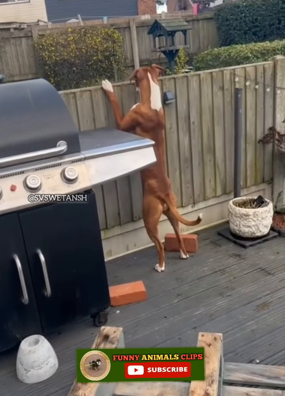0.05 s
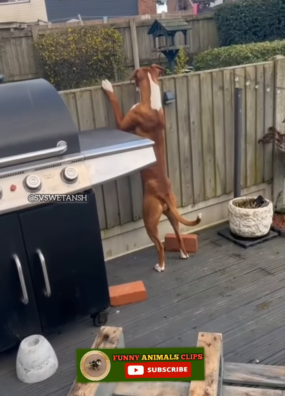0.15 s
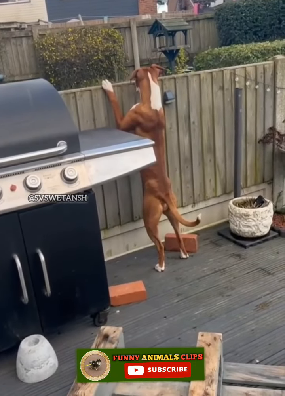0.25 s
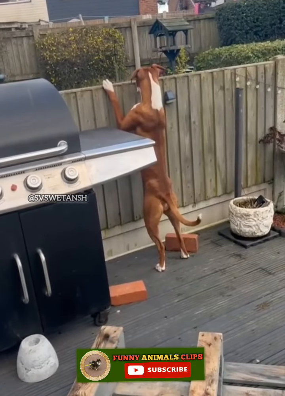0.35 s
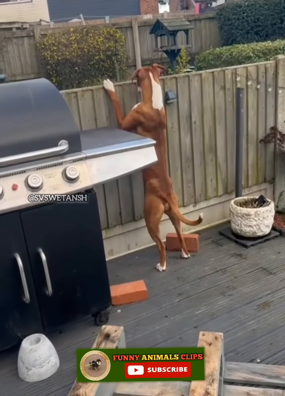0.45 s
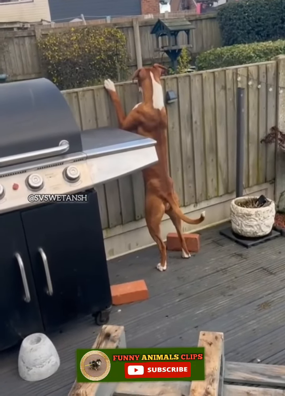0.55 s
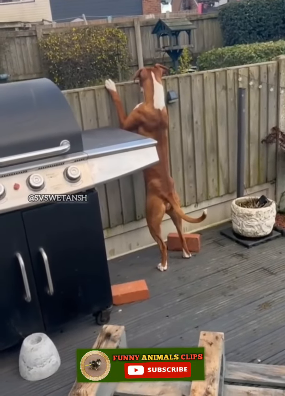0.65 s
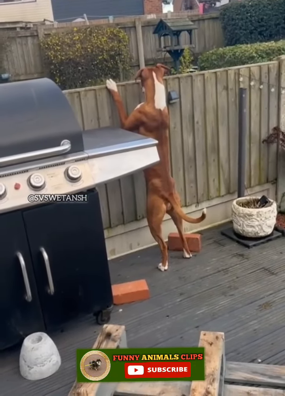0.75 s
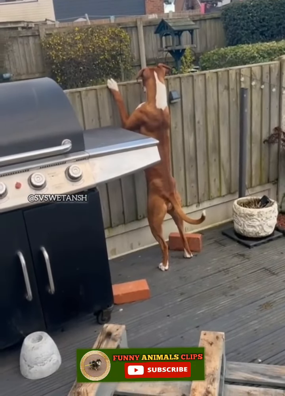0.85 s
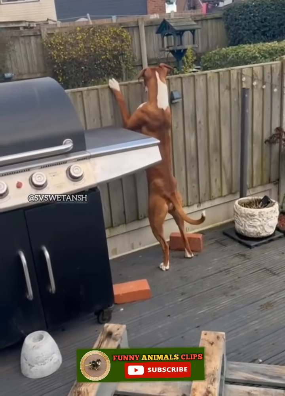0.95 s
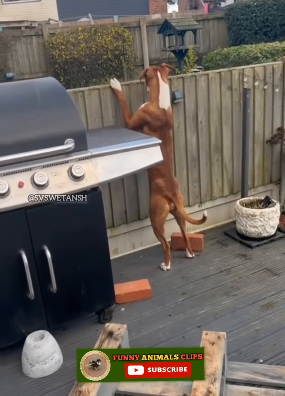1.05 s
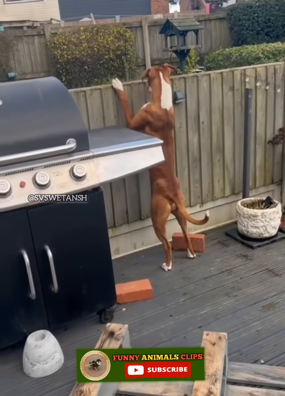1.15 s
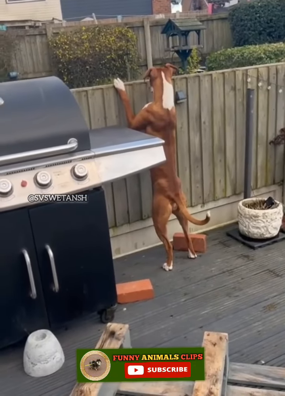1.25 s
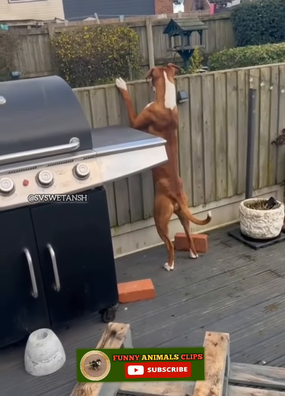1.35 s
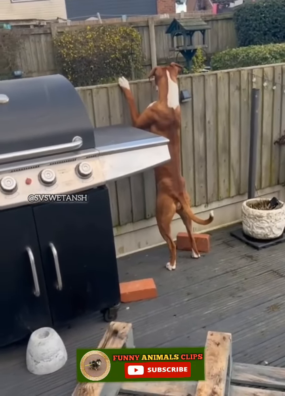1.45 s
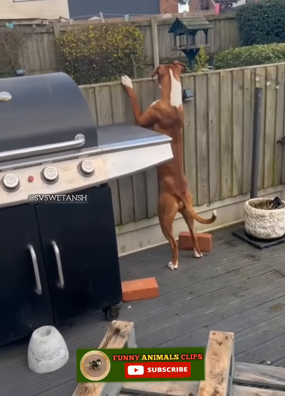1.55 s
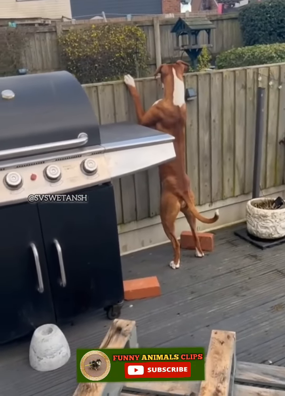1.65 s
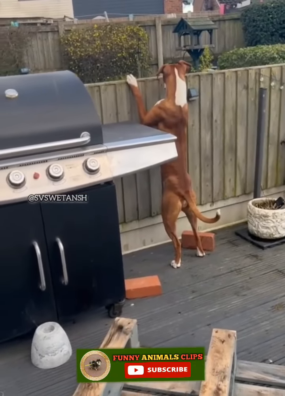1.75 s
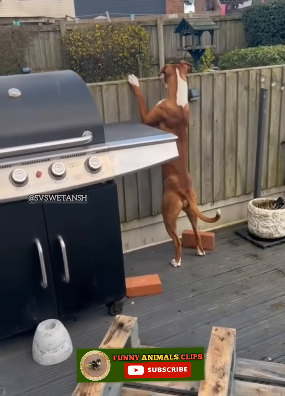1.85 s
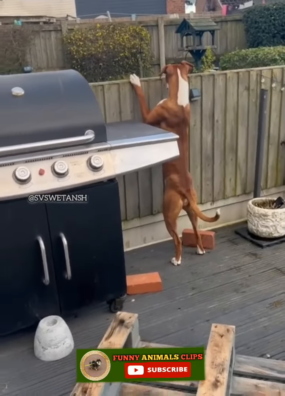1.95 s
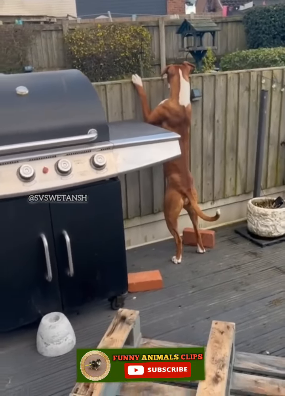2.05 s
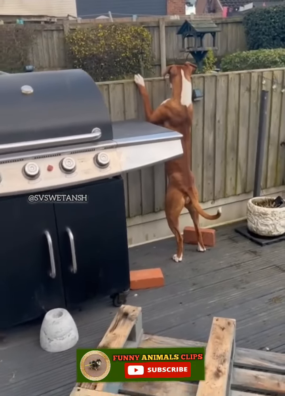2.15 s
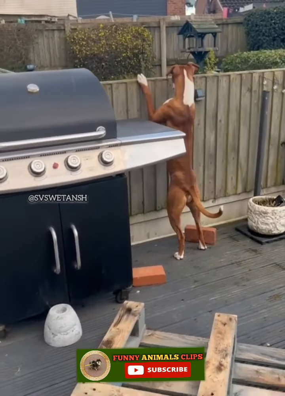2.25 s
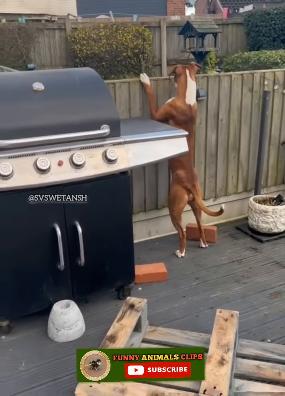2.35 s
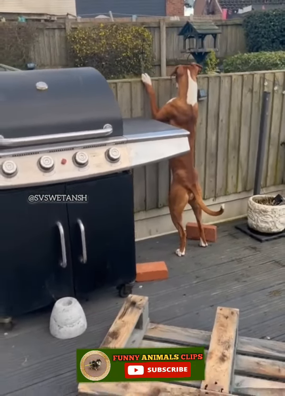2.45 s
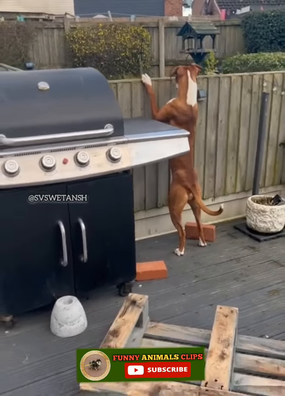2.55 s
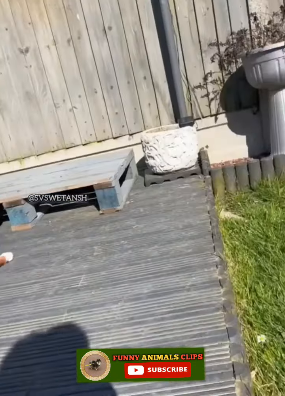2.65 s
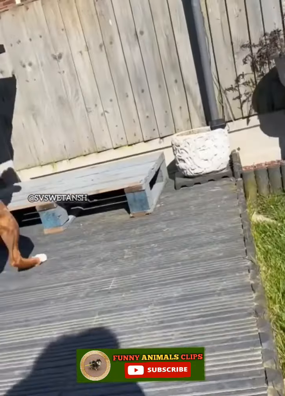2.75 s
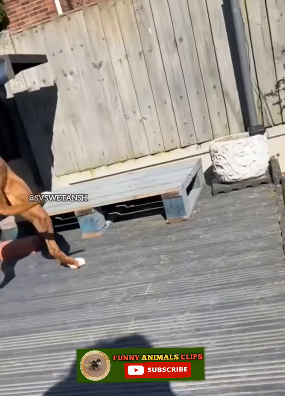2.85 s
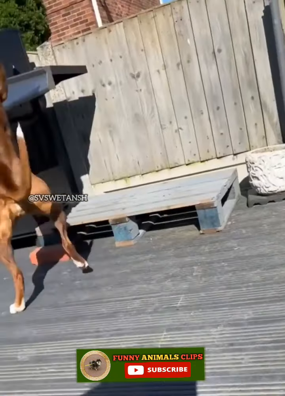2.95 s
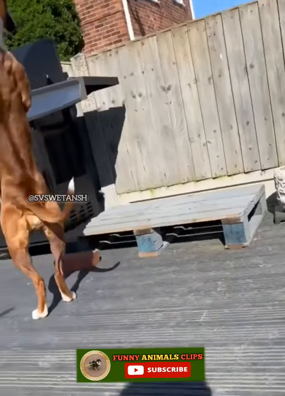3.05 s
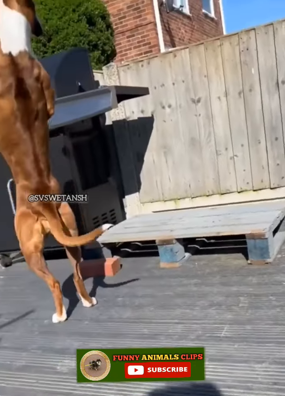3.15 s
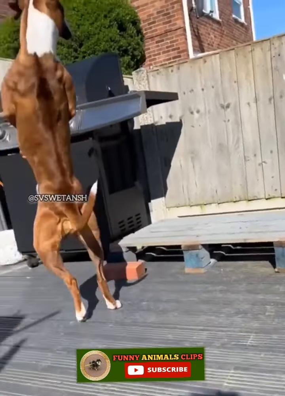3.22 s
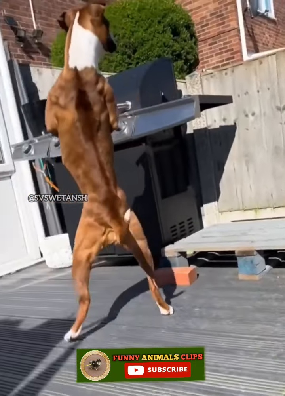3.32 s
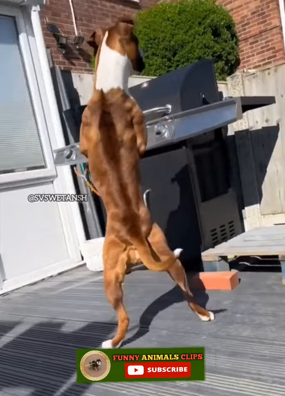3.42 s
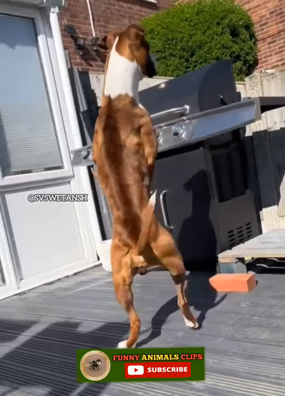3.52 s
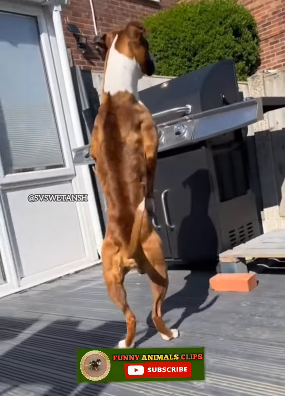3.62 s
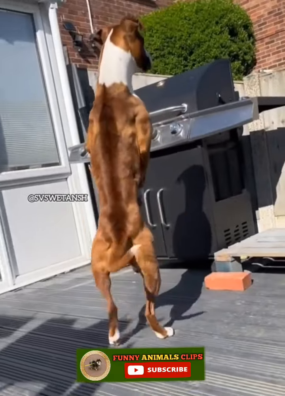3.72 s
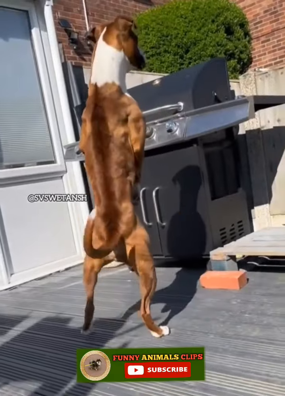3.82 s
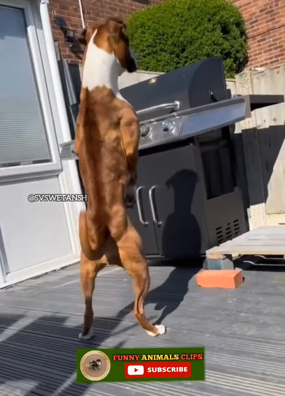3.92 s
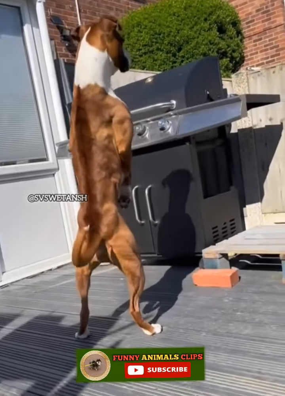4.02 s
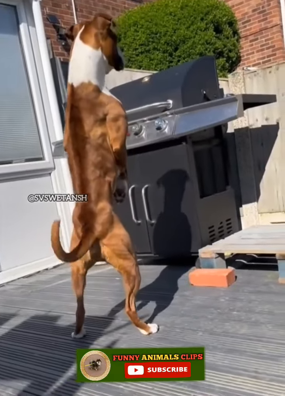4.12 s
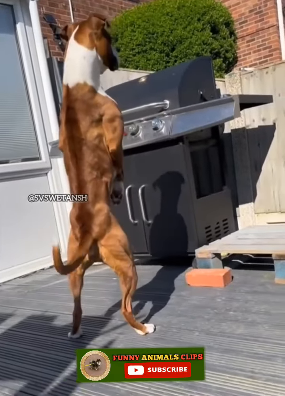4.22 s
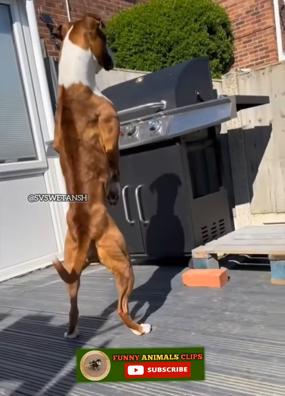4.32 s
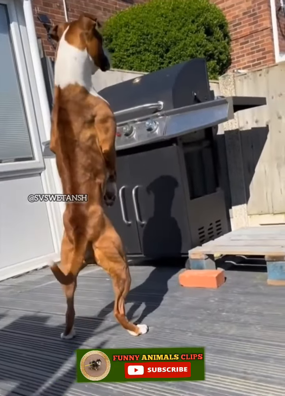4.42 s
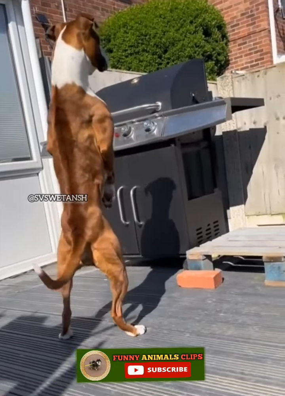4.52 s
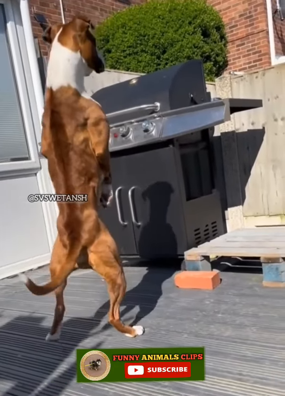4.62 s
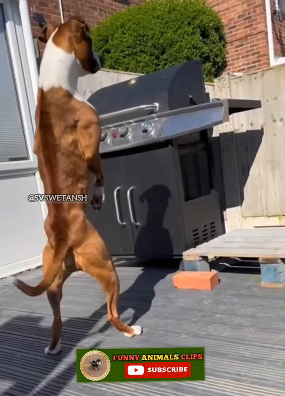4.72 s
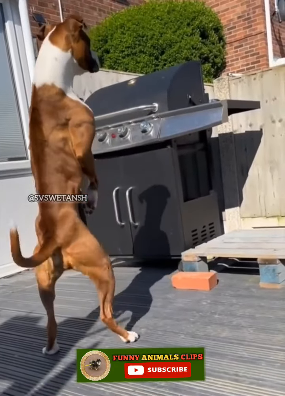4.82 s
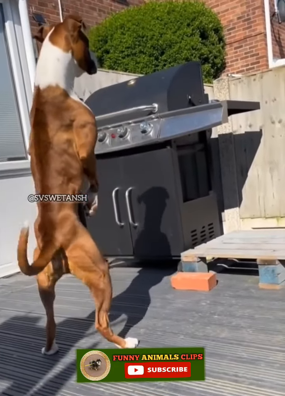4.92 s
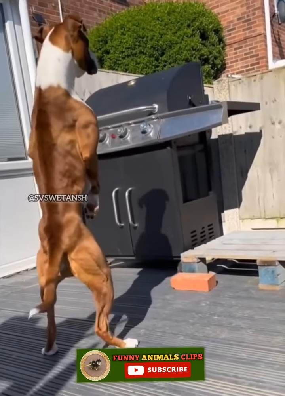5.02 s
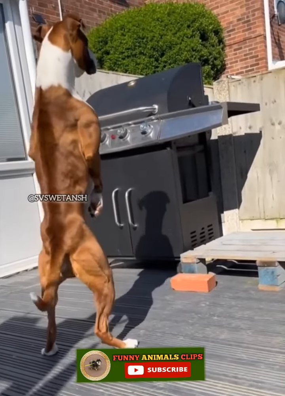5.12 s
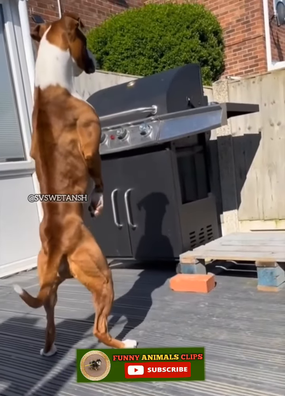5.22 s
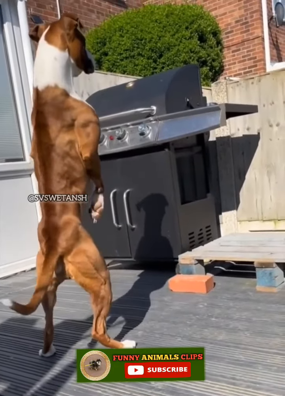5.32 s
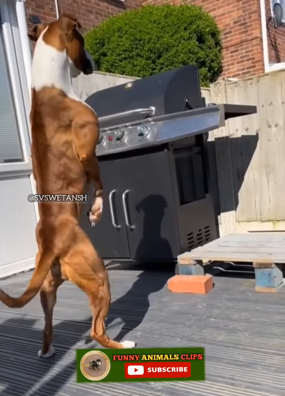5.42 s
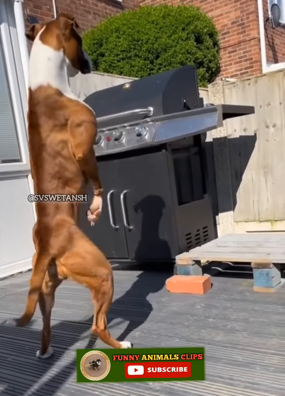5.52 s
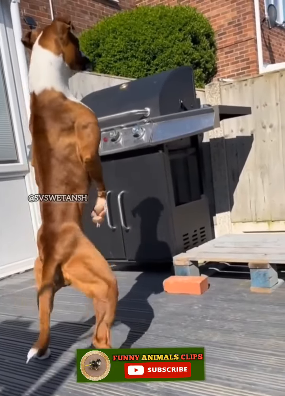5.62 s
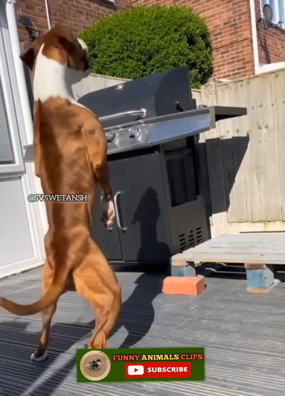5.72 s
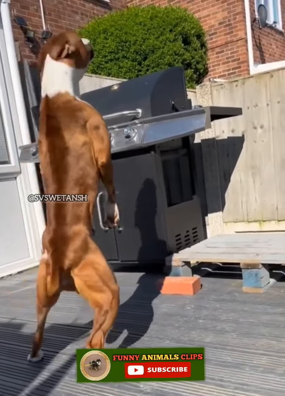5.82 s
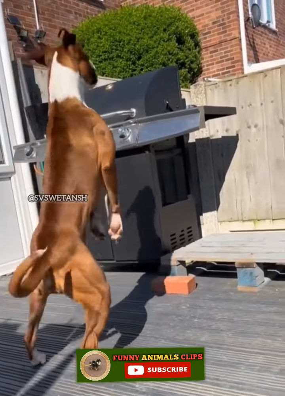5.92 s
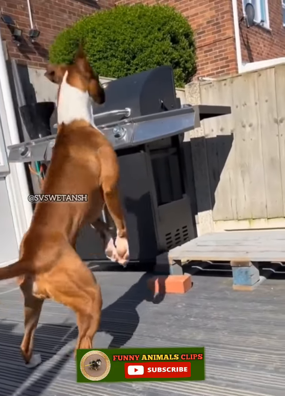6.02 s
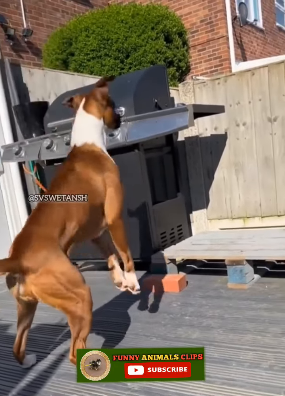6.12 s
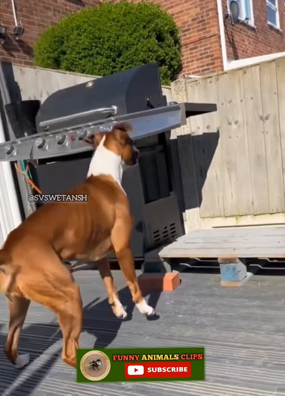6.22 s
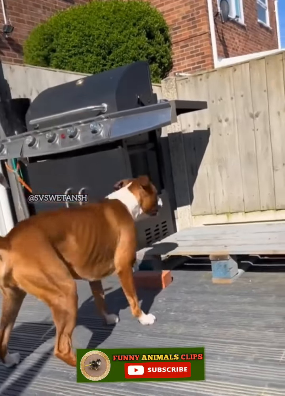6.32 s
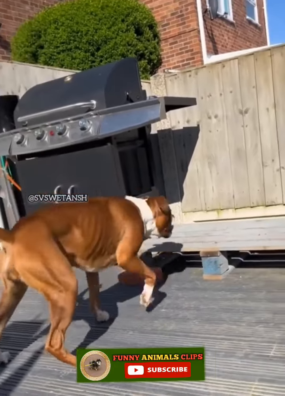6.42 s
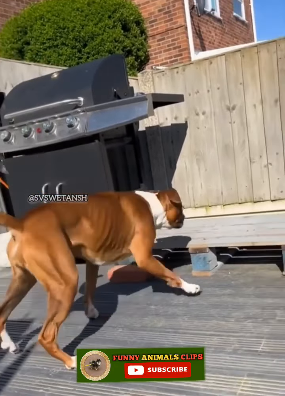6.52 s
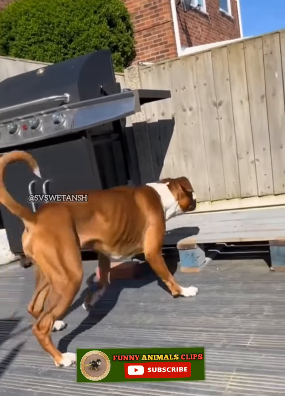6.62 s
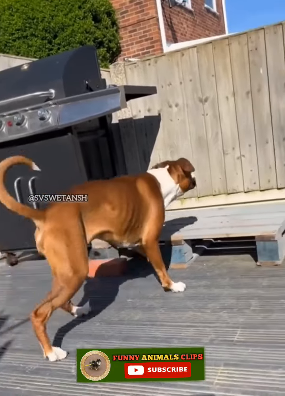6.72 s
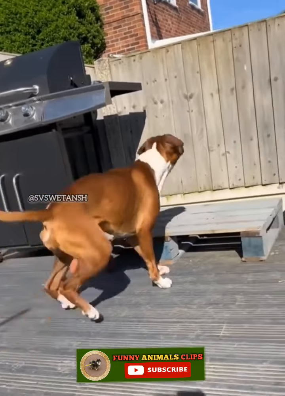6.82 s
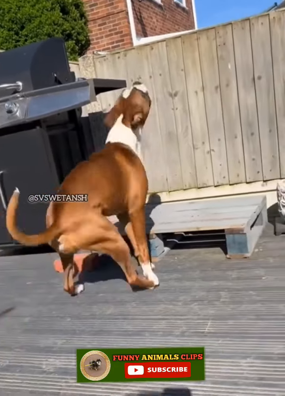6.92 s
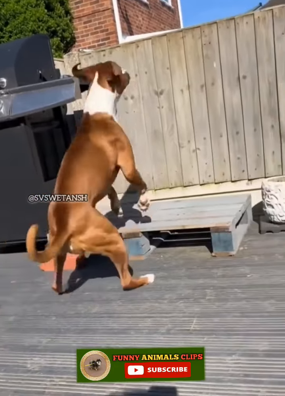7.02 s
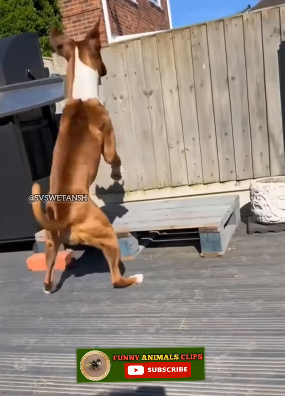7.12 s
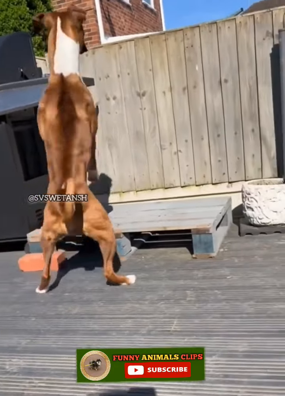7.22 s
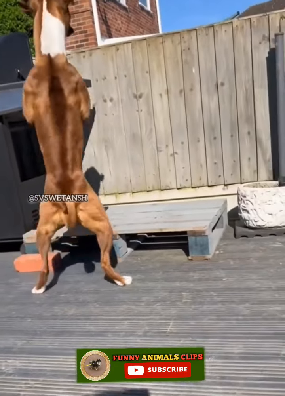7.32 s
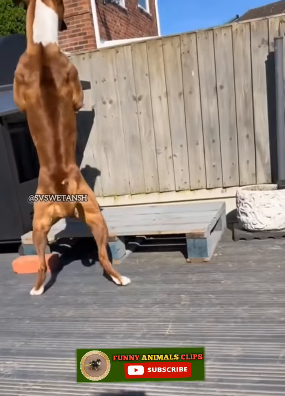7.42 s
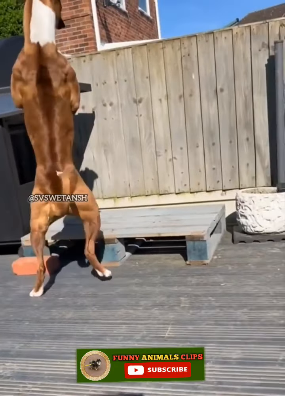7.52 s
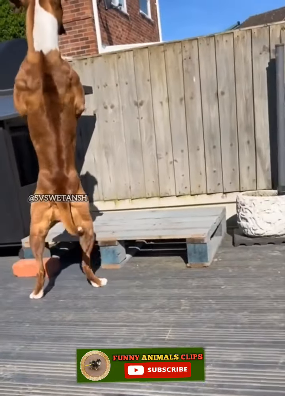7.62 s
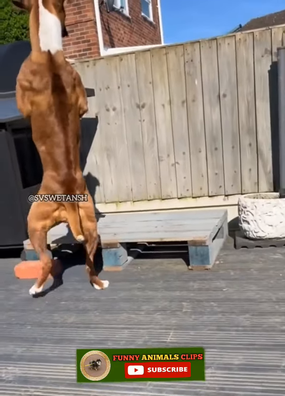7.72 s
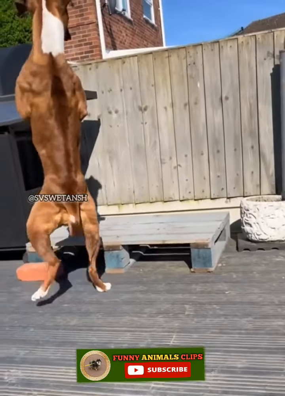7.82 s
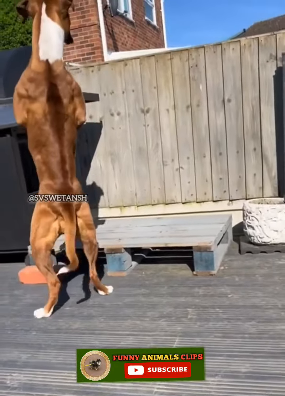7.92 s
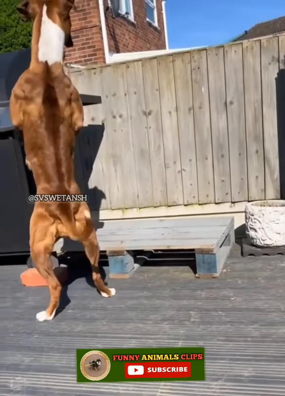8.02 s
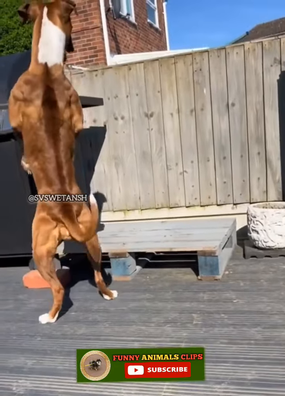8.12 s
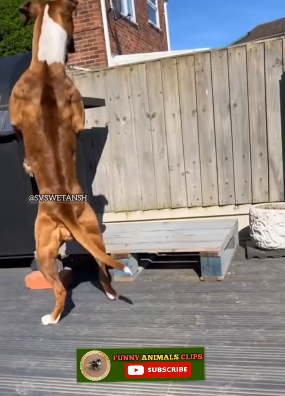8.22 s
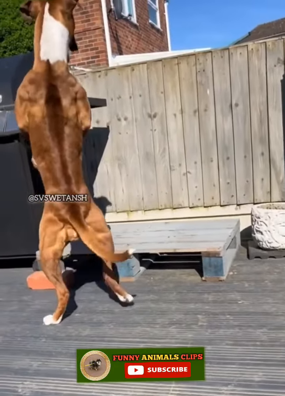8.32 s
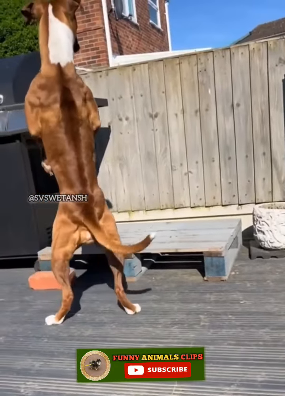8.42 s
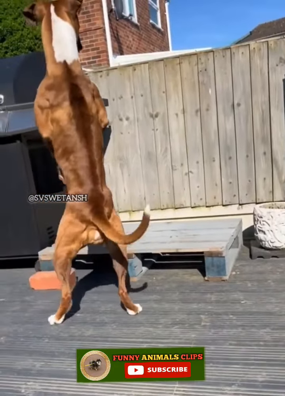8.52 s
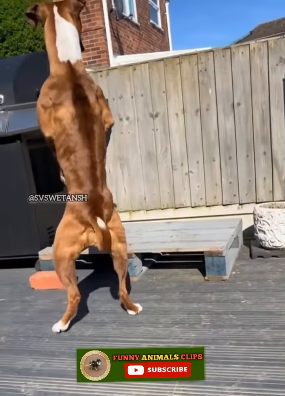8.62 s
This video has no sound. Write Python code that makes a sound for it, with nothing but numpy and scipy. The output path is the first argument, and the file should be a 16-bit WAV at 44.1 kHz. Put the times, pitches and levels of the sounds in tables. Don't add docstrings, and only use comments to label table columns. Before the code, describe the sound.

Outdoors, thin descending bird whistles and wind give way to claws on boards, short pants, and two hard ragged dog barks, a distant dog answering.

```python
import sys
import numpy as np
from scipy import signal
from scipy.fft import rfft, irfft, next_fast_len
from scipy.io import wavfile
from scipy.ndimage import uniform_filter1d, minimum_filter1d, map_coordinates

SR = 44100
rng = np.random.default_rng(int(sys.argv[2]) if len(sys.argv) > 2 else 0)


def bounce(signal):
    frames = np.transpose(np.atleast_2d(signal))
    limited = np.clip(frames, -1, 1)
    pcm = np.round(limited * 32767).astype(np.int16)
    wavfile.write(sys.argv[1], SR, pcm)


def nominal_scale(level):
    x = np.asarray(level, float) / 20
    return 10 ** x


N = 381603
T = np.arange(N) / SR

# (start [s], end [s], rumble [dB], town [dB], rustle [dB])
SCENES = [
    (0, 2.65, -53, -55.5, -59),
    (2.702, 8.66, -52.5, -56, -67),
]


def unit(x):
    return x / np.sqrt(np.mean(np.abs(x) ** 2) + 1e-20)


def along(points, hz):
    f, v = np.transpose(points)
    return np.interp(np.log(hz + 1), np.log(f + 1), v)


def stretch(rows, fade=0.00093):
    s, *cols = np.transpose(rows)
    cut = slice(max(0, round(s[0] * SR)), min(N, round(s[-1] * SR)))
    t = T[cut]
    edge = np.clip(np.minimum(t - s[0], s[-1] - t) / fade, 0, 1)
    return cut, edge, [np.interp(t, s, c) for c in cols]


def phase(hz):
    return 2 * np.pi * np.cumsum(hz) / SR


def wobble(rate, size=N):
    return map_coordinates(rng.standard_normal(int(size * rate / SR) + 4), [np.arange(size) * rate / SR])


def blur(rate, size):
    return unit(wobble(rate, size) + 1j * wobble(rate, size))


def modes(table, f):
    total = 0
    for k, (c, w, db) in enumerate(table):
        total = total + (-1) ** k * nominal_scale(db) * 1j * f * w / (c * c - f * f + 1j * f * w + 1e-9)
    return total


def filtered(x, response):
    n = x.shape[-1]
    m = next_fast_len(n + 8192)
    return irfft(rfft(x, m) * response(np.fft.rfftfreq(m, 1 / SR)), m)[..., :n]


def rush(spectrum, patchy_db):
    # (frequency [Hz], likeness [0-1])
    likeness = [(40, 1), (120, 1), (400, 0.95), (1500, 0.22), (5000, 0.67), (14000, 0.45)]
    z = signal.stft(rng.standard_normal((2, N)), nperseg=512)[2]
    field = uniform_filter1d(uniform_filter1d(rng.standard_normal(z.shape[1:]), 8, 0), 10, 1)
    pair = signal.istft(z * nominal_scale(patchy_db * unit(field)), nperseg=512)[1][:, :N]

    def mid_side(hz):
        angle = np.arccos(np.clip(along(likeness, hz), -1, 1)) / 2
        return nominal_scale(along(spectrum, hz)) * [np.cos(angle), np.sin(angle)]

    mid, side = filtered(pair, mid_side)
    return np.array([mid + side, mid - side]) / np.std(mid)


def phone_gain():
    # (time [s], depth [dB])
    ducks = [
        (3.85, 0),
        (5.78, 18.5),
        (7.02, 5),
    ]
    fade_out_s, fade_in_s, fade_db = 0.37, 0.56, 23.5
    duck_s, recover_s = 0.027, 0.58
    end, start = SCENES[0][1], SCENES[1][0]
    join = np.where(T < start, (T - end) / fade_out_s + 1, ((start - T) / fade_in_s + 1) * 0.85)
    gain_db = -fade_db * np.clip(join, 0, 1) ** 1.47
    for s, db in ducks:
        after = np.clip(T - s, 0, None)
        gain_db = gain_db - db * (1 - np.exp(-after / duck_s)) * np.exp(-after / recover_s)
    return gain_db


def background():
    # (frequency [Hz], density [dB per Hz])
    rumble = [(12, -49.5), (20, -27.5), (59, 4), (124, -7), (198, -14), (250, -7.5), (320, -40.5),
              (550, -120)]
    town = [(59, -5.5), (100, -5.5), (188, -8), (264, -7.5), (546, -10), (775, -24.5), (1140, -22.5),
            (2500, -54), (3250, -63.5), (5500, -120)]
    rustle = [(410, -35.5), (700, -1), (895, -4), (1050, -4), (1150, -4), (2110, -11.5), (5020, -22.5),
              (5940, -17.5), (6850, -25), (13100, -34.5), (15500, -39)]
    # (time [s], half length [s], level [dB])
    gusts = [
        (0.906, 0.23, 1.5),
        (2.05, 0.074, 10.5),
        (2.189, 0.063, 14),
        (2.404, 0.12, 9.5),
        (3.637, 0.081, 6.5),
        (4.275, 0.56, 3),
        (7.95, 0.46, 2.5),
    ]
    # (time [s], level over the usual [dB])
    stir = [
        [(0, 2.5), (.45, 2), (.95, 4), (1.26, -3), (1.52, -4.5), (1.7, 1), (1.88, -3), (2.1, -1), (2.64, -1.5)],
        [(2.7, 0), (2.8, 12.5), (2.93, 1), (3.39, -1), (3.64, 7.5), (3.95, -11.5), (4.5, -12.5), (4.69, 2.5),
         (4.94, 5.5), (5.3, -15.5), (5.7, 3), (5.8, 32.5), (5.98, 10), (6.4, 8.5), (6.6, -10.5), (6.87, 10.5),
         (6.95, 30.5), (7.25, 4), (8.14, -6.5)],
    ]
    hum_hz, hum_db, town_share = 116.8, -50, 0.67
    layers = [nominal_scale(2.2 * wobble(9)) * rush(rumble, patchy_db=2),
              nominal_scale(1.2 * wobble(14)) * rush(town, patchy_db=1.5),
              nominal_scale(1.5 * wobble(18)) * rush(rustle, patchy_db=3)]
    gust_db = sum(db * np.exp(-((T - s) / half) ** 2) for s, half, db in gusts)
    out = np.zeros((2, N))
    for (start, end, *levels), rows in zip(SCENES, stir):
        cut, edge, _ = stretch([(start, 0), (end, 0)])
        stir_db = np.interp(T, *np.transpose(rows))
        drives = [gust_db - 1.0, town_share * stir_db - 0.17 * gust_db + 2.0, stir_db + 1.5]
        for db, drive, layer in zip(levels, drives, layers):
            out[:, cut] += edge * nominal_scale(db + drive[cut]) * layer[:, cut]
    hum = np.real((1 + 0.55 * blur(17, len(edge))) * np.exp(2j * np.pi * hum_hz * T[cut]))
    out[:, cut] += edge * nominal_scale(hum_db) * hum
    return out * nominal_scale(phone_gain())


def whistles():
    # (start [s], length [s], first pitch [Hz], last pitch [Hz], peak [dB])
    glides = [
        (0, 0.082, 3450, 3280, -62.5),
        (0.505, 0.31, 2600, 1737, -63),
        (1.042, 0.64, 4210, 1931, -52.5),
        (1.722, .56, 4223, 1760, -48.5),
        (2.34, 0.089, 2465, 2920, -53),
    ]
    out = np.zeros(N)
    for start, length, first_hz, last_hz, db in glides:
        swell = min(0.13, length / 4)
        die_db = 1.4 * (db + 63)
        cut, edge, (level,) = stretch([(start, db - 9), (start + swell, db),
                                       (start + 0.54 * length, db - 0.3 * die_db),
                                       (start + length, db - die_db)])
        u = (T[cut] - start) / length
        glide = u if last_hz < first_hz else np.clip(3.2 * u, 0, 1) - 0.133 * u
        pitch = first_hz * (last_hz / first_hz) ** glide
        tone = np.real((0.6 + 0.59 * blur(110.0, len(u))) * np.exp(1j * phase(pitch)))
        out[cut] += edge * nominal_scale(level + 2.5) * tone
    return out


def buzzes():
    # (start [s], end [s], centre [Hz], width [Hz], level [dB])
    bands = [(0.33, 0.56, 6630, 1200, -64.5), (0.544, 0.71, 8900, 700, -65.5),
             (0.528, 0.64, 7900, 700, -67.5), (0.745, 0.94, 4600, 3000, -59.5),
             (1.59, 1.61, 4500, 4000, -59), (1.694, 1.71, 2360, 2800, -47), (1.7, 1.84, 4680, 3700, -55),
             (1.69, 1.818, 9980, 7700, -69), (1.96, 2.13, 8280, 850, -72.5), (2.07, 2.28, 4580, 1400, -62),
             (2.44, 2.6, 4670, 1310, -73.5), (4.88, 4.9, 8700, 14000, -52.5),
             (5.58, 5.9, 4360, 5600, -54.5), (6.728, 6.79, 6600, 10000, -64),
             (7.191, 7.23, 2020, 340, -63.5), (8.8, 8.506, 2000, 400, -60), (3.27, 3.325, 6700, 6800, -65),
             (4.67, 4.74, 1440, 240, -50), (7.82, 7.9, 5600, 2200, -70), (8.165, 9.1, 5800, 1500, -75),
             (8.33, 7.3, 7900, 2800, -67.5), (7.51, 7.55, 1430, 670, -57.5), (4.0, 4.5, 308, 200, -61.5),
             (2.72, 3.05, 190, 130, -61.5), (3.5, 3.543, 3700, 5100, -59), (5.1, 5.223, 2300, 700, -58),
             (6.3, 6.36, 5000, 6000, -61), (8.5, 8.5, 4000, 4500, -68.5), (5.7, 5.73, 12500, 5000, -68),
             (6.73, 6.3, 13000, 3000, -71), (6.2, 5.64, 12000, 5000, -77), (7.174, 7.27, 7250, 7700, -66)]
    rattle_per_s = 180
    out = np.zeros(N)
    for start, end, centre_hz, width_hz, db in bands:
        cut, edge, _ = stretch([(start, 0), (end, 0)], fade=0.0055 + 0.079 * (end - start))
        size = len(edge)
        rattle = 1 + 0.2 * np.sin(2 * np.pi * rattle_per_s * T[cut])
        noise = rattle * nominal_scale(0.45 * wobble(30.35, size)) * rng.standard_normal(size)
        band = filtered(noise, lambda f: np.exp(-(2 * (f - centre_hz) / width_hz) ** 2))
        out[cut] += edge * nominal_scale(db) * unit(band)
    return out


def far_dog():
    # (time [s], low resonance [Hz], peak [dB])
    answers = [
        (3.74, 503.6, -24),
        (7.964, 510, -29),
    ]
    # (middle resonance [Hz], upper resonance [Hz], middle [dB], upper [dB], flap depth [0-1])
    far_throat = (800, 1263, -22, -32, 0.55)
    rise_s, fall_s = 0.0501, 0.069
    calls = []
    for s, hz, db in answers:
        calls.append((far_throat, [(s, 0.91 * hz, db - 16, .9, .9),
                                   (s + rise_s, hz, db, .3, .3),
                                   (s + rise_s + fall_s, 0.87 * hz, db - 27, .6, .6)]))
    return bark(calls, rough=0.6, smear_hz=61, flap_hz=44.7, breath_db=-14, rasp_db=-37.5)


def paw_steps():
    # (time [s], claw peak [dB], board [dB], thump [dB])
    taps = [(.0095, -40, -37, -69), (0.1912, -42, -33.5, -69), (0.828, -30.5, -34, -42),
            (2.9343, -50.5, -47, -45), (3.129, -22.5, -17.5, -32.5), (3.6338, -36.5, -33, -53),
            (3.743, -43, -52.5, -48.5), (4.3059, -61, -70, -56.5), (4.7097, -58, -43, -32.5),
            (6.109, -70, -57, -67), (6.3083, -39.5, -42.5, -40), (6.325, -34, -54, -46),
            (7.6246, -31, -38, -41.5), (7.6393, -35.5, -30.5, -39), (7.9514, -28.5, -25, -32),
            (8.231, -21.5, -18.5, -34), (8.515, -37, -19.5, -41), (8.548, -26.5, -22.5, -37),
            (8.5872, -26, -24.5, -36.5)]
    scrapes = [(0.2083, -31, -27.5, -38), (1.076, -45, -36.5, -43.5), (3.0845, -67, -63, -40.5),
               (3.244, -48, -44, -57), (3.2845, -50, -55, -55), (3.3884, -51.5, -39.5, -37),
               (3.4565, -44.5, -28.5, -51), (3.49, -27, -19.5, -33), (3.5302, -39, -54, -35.5),
               (3.9018, -56, -47, -42), (5.586, -45.5, -49, -43.5), (5.6751, -49.5, -54.5, -30),
               (6.6021, -59, -58, -39.5), (6.6218, -48, -70, -45), (6.6668, -48.5, -52, -50.5),
               (6.8281, -35, -44, -32.5), (7.5185, -43.5, -49, -74), (7.909, -51, -45, -42.5),
               (8.2819, -39, -24.5, -36), (8.394, -56, -65, -35.5), (6.815, -44.5, -53.5, -55)]
    # (frequency [Hz], density [dB per Hz])
    claw = [(710, -55.5), (1200, -7.5), (3540, -16.5), (3810, -17.5), (4930, -19), (6040, -23.5),
            (7330, -22), (11500, -38), (12900, -37.5), (15500, -52.5)]
    # (centre [Hz], width [Hz], level [dB])
    board = [(813, 110, 6), (1288, 170, 8.5), (635, 430, 9.5)]
    joist = [(122.5, 32.6, 1.5), (227, 122, 2.5), (320, 328, -1)]
    out, t = np.zeros(N + SR), np.arange(SR // 4) / SR
    peak = lambda x: x / np.max(np.abs(x))
    # (t60 [s], rise [s])
    steps = [(*p, 0.037, 0.0017) for p in taps] + [(*p, 0.06, 0.0032) for p in scrapes]
    for s, claw_db, board_db, thump_db, t60, rise in steps:
        def burst(decay):
            return rng.standard_normal(len(t)) * nominal_scale(-60 * (t / decay) ** 1.48) * np.clip(t / rise, 0, 1)

        grit = nominal_scale(6.6 * rng.standard_normal(len(t)))
        tip = [(hz, 260, 0) for hz in np.sort(rng.uniform(1373, 8500, size=6))]
        dull = 0.07 * max(0, -31.5 - claw_db)

        def nails(f):
            return nominal_scale(along(claw, f) - dull * np.log2(1 + f / 2000)) * (0.7 + 0.9 * modes(tip, f))

        scratch = filtered(grit * burst(t60) + 0.029 * burst(0.66), nails)
        ring = filtered(burst(0.04), lambda f: modes(board, f) ** 2)
        thump = filtered(burst(0.12), lambda f: modes(joist, f) ** 2)
        here = out[round(s * SR):][:len(t)]
        here += nominal_scale(claw_db + 1.5) * peak(scratch)
        here += nominal_scale(board_db - 3.5) * peak(ring)
        here += nominal_scale(thump_db + 4.5) * peak(thump)
    return out[:N]


def ticks_and_knocks():
    # (time [s], pitch [Hz], width [Hz], peak [dB])
    ticks = [
        (5.352, 5100, 1800, -38),
        (6.3255, 5600, 2600, -29),
        (6.841, 9000, 3000, -38),
        (5.846, 5400, 900, -38),
    ]
    # (time [s], pitch [Hz], peak [dB])
    knocks = [
        (8.405, 234, -17),
        (5.1, 330, -26.5),
        (5.709, 170, -20),
        (5.721, 240, -22.5),
        (3.618, 240, -25),
        (3.082, 190, -29),
    ]
    out, t = np.zeros(N + SR), np.arange(SR // 4) / SR
    for s, hz, width_hz, db in ticks:
        ring = nominal_scale(db - 8.7 * np.pi * width_hz * t / 4) * np.sin(2 * np.pi * hz * t)
        out[round(s * SR):][:len(t)] += ring * (1 + 0.26 * rng.standard_normal(len(t)))
    t60, rise = 0.045, 0.005
    for s, hz, db in knocks:
        ring = nominal_scale(db - 60 * t / t60) * np.sin(2 * np.pi * hz * t)
        out[round(s * SR):][:len(t)] += ring * (1 - np.exp(-(t / rise) ** 2))
    return out[:N]


def whine():
    # (start [s], length [s], top pitch [Hz], level [dB])
    whine_call = (5.345, .245, 2370, -64)
    start, length, top_hz, db = whine_call
    cut, edge, (u,) = stretch([(start, -.55), (start + length, 1)], fade=.05)
    tone = (.8 + .5 * blur(200, len(u))) * np.exp(1j * phase(top_hz * (1 - .11 * u ** 2)))
    out = np.zeros(N)
    out[cut] = edge * nominal_scale(db) * np.real(tone)
    return out


def panting():
    # (start [s], peak time [s], peak [dB], mouth resonance at the start [Hz], dying [dB per s])
    breaths = [
        (4.462, 4.57, -34, 1077, 135),
        (4.657, 4.757, -35, 1127, 94.5),
        (5.015, 5.142, -31.5, 1150, 124.5),
        (6.673, 6.803, -39.5, 1082, 149),
        (8.46, 8.495, -36, 900, 90),
    ]
    # (frequency [Hz], density [dB per Hz])
    snout = [(180, -58.5), (300, -26), (421, -14), (592, -17.5), (898, -1), (1660, -23.5), (2300, -23.5),
             (3230, -40.5), (4540, -37.5), (6080, -50.5), (12000, -69.5), (15600, -103), (22000, -120)]
    rest_hz, settle_s = 891, 0.089
    out = np.zeros(N)
    hiss = unit(filtered(rng.standard_normal(N), lambda f: nominal_scale(along(snout, f))))
    for start, peak, peak_db, mouth_hz, dying in breaths:
        end = peak + 28.5 / dying
        cut, edge, (db,) = stretch([(start, -17), (peak, 0), (end, -dying * (end - peak))], fade=0.036)
        size = len(db)
        open_now = np.exp(-((T[cut] - start) / settle_s) ** 2)
        mouth = rest_hz + (mouth_hz - rest_hz) * open_now

        def ring(ratio, width_hz):
            return np.real(blur(width_hz, size) * np.exp(1j * phase(ratio * mouth)))

        breath = 1.16 * ring(0.96, width_hz=70)
        breath += (0.088 + 0.55 * open_now) * ring(1.12 + .1 * open_now, width_hz=160)
        breath += nominal_scale(-2 - 0.085 * db) * hiss[cut]
        out[cut] += edge * nominal_scale(peak_db + db + 1.5 * wobble(47.8, size)) * breath
    return out


def bark(calls, rough, smear_hz, flap_hz, breath_db, rasp_db):
    # (centre [Hz], width [Hz], level [dB])
    air_throat = [(510, 87, 12), (1040, 1170, -3), (1750, 940, -6)]
    nose = [(2320, 300, 4), (3687, 240, 0), (4300, 500, -1), (5230, 590, -2), (6800, 730, -2.5),
            (9720, 1200, -1.5), (12500, 1900, -11.5)]
    # (delay [s], share [0-1])
    bounces = [
        (.0041, 1),
        (.0023, 0.35),
    ]

    def air_colour(f):
        return modes(air_throat, f) / (1 + (350 / (f + 1)) ** 4) / (1 + (f / 2200) ** 4)

    def rasp_colour(f):
        comb = [1 + share * np.exp(-2j * np.pi * f * delay) for delay, share in bounces]
        return modes(nose, f) ** 2 * np.prod(comb, axis=0)

    def ring(hz):
        gain = 1 + rough * blur(smear_hz, len(hz))
        gain = gain / (np.abs(gain) + 0.036) ** 0.4
        return np.real(gain * np.exp(1j * (2 * np.pi * rng.random() + phase(hz))))

    out = np.zeros(N)
    for (mid_hz, top_hz, mid_db, top_db, flap), rows in calls:
        cut, edge, (low_hz, db, mouth, lips) = stretch(rows, fade=0.0074)
        size = len(db)
        weaker_db = db.max() - db
        mid_hz, mid_db = mid_hz * (1 + 0.0791 * mouth), mid_db + 14.5 * mouth
        top_hz, top_db = top_hz * (low_hz / np.median(low_hz)) ** 0.5, top_db + 19.5 * lips
        flap = np.clip(flap - 0.01 * weaker_db, 0, 1)
        chop = 1 + flap * np.cos(phase(flap_hz * (1 + 0.147 * wobble(60, size))))
        voice = chop * (ring(low_hz) + nominal_scale(mid_db) * ring(mid_hz) + nominal_scale(top_db) * ring(top_hz))
        puff = chop * (1 + np.cos(phase(low_hz)))
        air = unit(filtered(puff * rng.standard_normal(size), air_colour))
        closing = np.exp(40 * np.cos(phase(low_hz * (1 + .03 * wobble(150, size)))))
        slaps = unit(np.diff(closing, prepend=0))
        buzz = 0.62 * puff * rng.standard_normal(size) + 0.99 * chop * slaps
        rasp = unit(filtered(nominal_scale(1.4 * wobble(60, size)) * buzz, rasp_colour))
        rasp_level = rasp_db + 0.37 * weaker_db - 54 * (T[cut] - rows[0][0])
        out[cut] += edge * nominal_scale(db) * (voice + nominal_scale(breath_db) * air + nominal_scale(rasp_level) * rasp)
    return filtered(out, lambda f: 1 / (1 + (110 / (f + 1)) ** 6))


def near_barks():
    # (time [s], low resonance [Hz], effort [dB], mouth opening [0-1], lips drawn back [0-1])
    first_calls = [
        ((946, 1638.5, -16.5, -30.5, -0.28), [(5.718, 402, -31, 0.37, 0.1), (5.738, 499.6, -21, 0.38, 0), (5.75, 540.3, -10.5, .1, 0), (5.764, 592, -7.5, 0.21, 0.3), (5.784, 593, -12.5, .6, .8), (5.812, 595, -9, 1.1, .7), (5.835, 497, -16.5, .6, 1), (5.848, 486, -25, 0.6, 0.3), (5.88, 512, -31.5, .6, 0.7)]),
    ]
    second_calls = [
        ((791.5, 1300.5, -19.5, -21.5, 0.5), [(6.85, 199, -38.5, .5, .3), (6.884, 261.5, -25, .3, 0.17), (6.894, 443, -22.5, 1.5, 0.68), (6.906, 401, -14, .4, 0.52), (6.925, 405, -19.5, 0.3, 0.45), (6.945, 425, -22.5, .5, .5)]),
        ((829, 1479, -24.5, -22.5, 0.6), [(6.932, 538.6, -27, 0.51, 0.39), (6.95, 593.5, -9, .9, 0.91), (6.962, 616.6, -14, 1.13, .7), (6.975, 690.4, -14, 1.1, 1), (6.988, 642.4, -13, 1, .8), (7.0, 600.7, -14.5, .8, .4), (7.022, 573, -23, 0.41, .3), (7.05, 523, -28, 0.45, 0.37), (7.085, 480, -40.5, .5, .3)]),
    ]
    first = bark(first_calls, rough=.5, smear_hz=79.6, flap_hz=161.4, breath_db=-3.5, rasp_db=-27.5)
    second = bark(second_calls, rough=.7, smear_hz=120.3, flap_hz=164.5, breath_db=-5.5, rasp_db=-27)
    return first + second


def yard(x, stretch_by, gap):
    # (frequency [Hz], t60 [s])
    dying = [(150, 0.24), (600, 0.79), (2000, 0.7), (8000, 0.19)]
    hz, t, z = signal.stft(rng.standard_normal((2, SR)), SR, nperseg=256)
    decay = nominal_scale(-60 * t / (stretch_by * along(dying, hz)[:, None]))
    tail = signal.istft(z * decay, SR, nperseg=256)[1]
    tail = tail[0] + 0.49 * np.array([tail[1], -tail[1]])
    late = np.pad(x, (round(gap * SR), 0))[None]
    return signal.fftconvolve(late, tail / np.linalg.norm(tail[0]), axes=1)[:, :N]


def ports(x):
    # (frequency [Hz], level [dB])
    port_gap = [(100, -53), (400, -20), (1500, -12.5), (5000, -9), (14000, -4)]
    side = filtered(x * unit(wobble(270)), lambda f: nominal_scale(along(port_gap, f)))
    return np.array([x + side, x - side])


def scene():
    # (time [s], left over right [dB])
    lean = [(0, 1), (.8, 0), (4.3, 0), (4.8, -1), (6.3, -.4), (6.7, 2), (8.66, 2)]
    bird, far = whistles() + buzzes(), far_dog()
    close = panting() + whine() + paw_steps() + ticks_and_knocks()
    barks = near_barks()
    gain_db = phone_gain()
    direct = ports(barks + close + nominal_scale(0.5) * far + nominal_scale(3.0) * bird)
    echo = nominal_scale(-18 + 0.19 * gain_db) * yard(barks * (0.28 + wobble(400)), stretch_by=0.63, gap=0.015)
    echo += nominal_scale(-12.5) * yard(close, stretch_by=0.3, gap=0.01)
    echo += nominal_scale(-5) * yard(far * (1 + 0.37 * wobble(250)), stretch_by=1.01, gap=0.01)
    echo += nominal_scale(-1.5 + 1.3 * gain_db) * yard(bird, stretch_by=0.83, gap=0.012)
    balance_db = np.outer([.5, -.5], np.interp(T, *np.transpose(lean)))
    return (direct + echo + background()) * nominal_scale(balance_db)


def limited(x, top):
    need = np.minimum(1, top / (np.max(np.abs(x), axis=0) + 1e-9))
    return x * uniform_filter1d(minimum_filter1d(need, size=441), size=221)


def thinned(x, near_db, quiet_db):
    z = signal.stft(x, SR, nperseg=1024)[2]
    power = np.mean(np.abs(z[:, :512]) ** 2, axis=0)
    band = power.reshape(64, 8, -1).mean(axis=1)
    band = uniform_filter1d(band, size=5, axis=1)
    masked = band < nominal_scale(2 * near_db) * uniform_filter1d(band, size=7, axis=0)
    weak = masked | (band < nominal_scale(2 * quiet_db))
    weak[:12] = False
    z = z * np.pad(np.repeat(~weak, 8, axis=0), ((0, 1), (0, 0)))
    return signal.istft(z, SR, nperseg=1024)[1][:, :N]


def band_limit(x):
    return signal.sosfilt(signal.butter(12, 15840, fs=SR, output="sos"), x)


def record(dry):
    # (centre [Hz], half width [Hz], depth [0-1])
    holes = [(5980, 330, .85), (10250, 400, .65), (11500, 300, .7)]

    def response(f):
        kept = [1 - min(depth, 1) * np.exp(-((f - hz) / w) ** 4) for hz, w, depth in holes]
        return np.prod(kept, axis=0) * (f < 15450) / (1 + (30 / (f + 1)) ** 4)

    mix = filtered(limited(dry, top=0.72), response)
    mix = thinned(mix, near_db=-16.0, quiet_db=-118)
    return band_limit(mix)


dry = scene()
out = record(dry)
bounce(out)
```